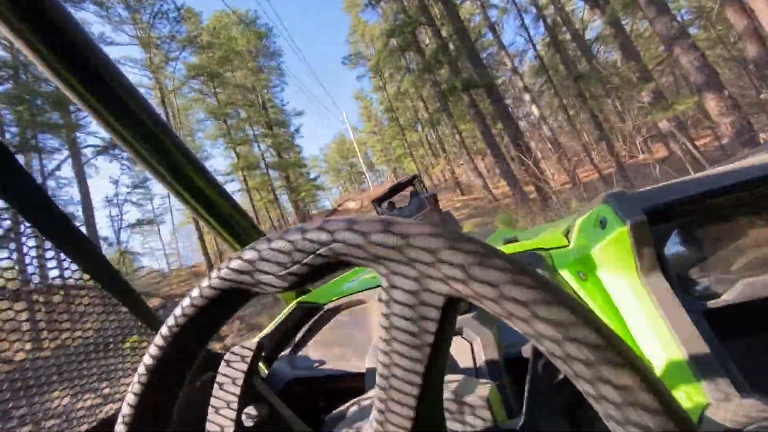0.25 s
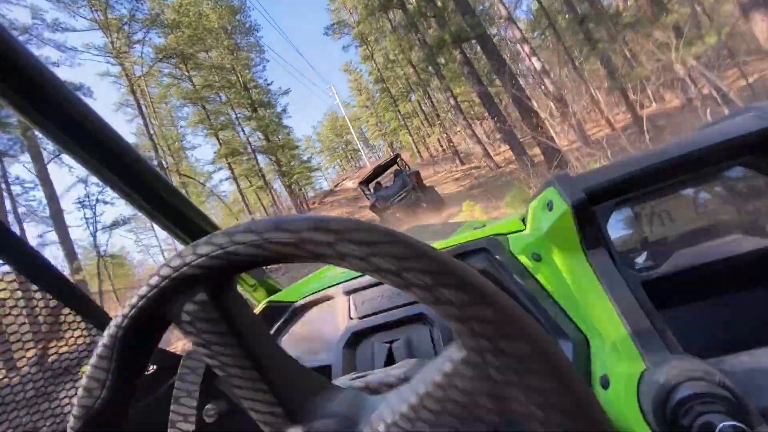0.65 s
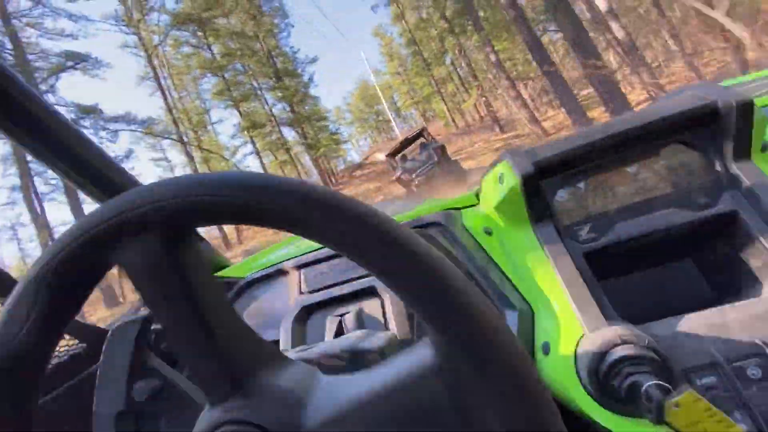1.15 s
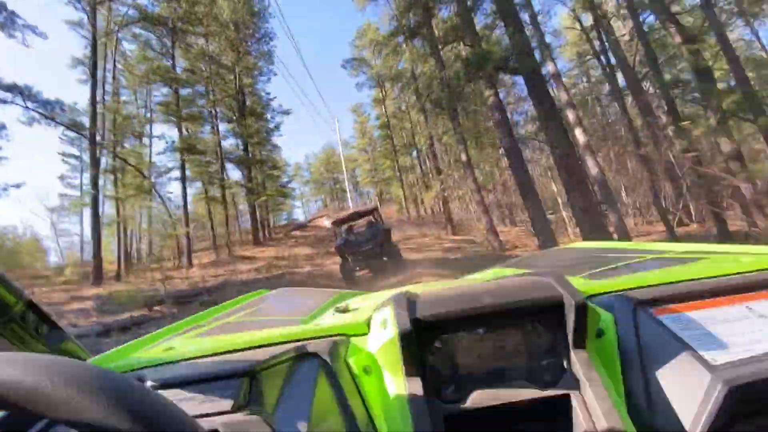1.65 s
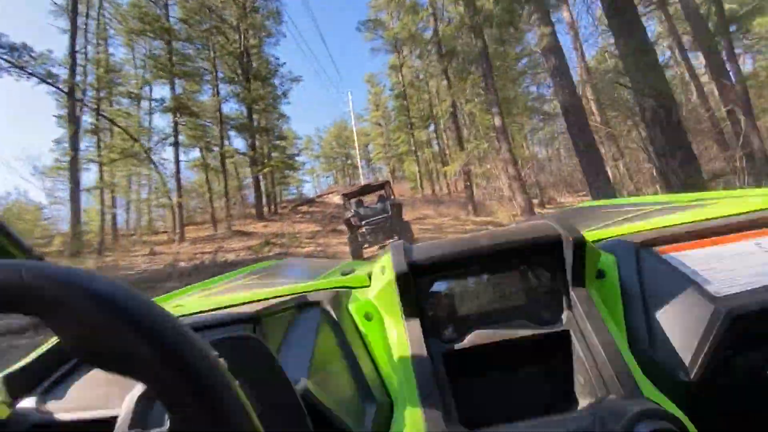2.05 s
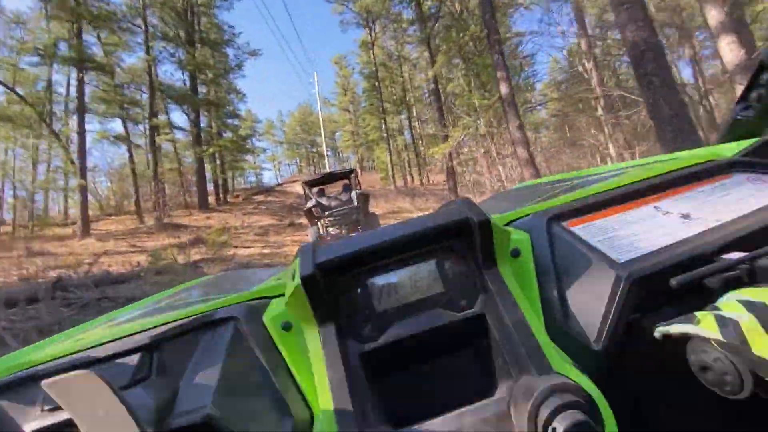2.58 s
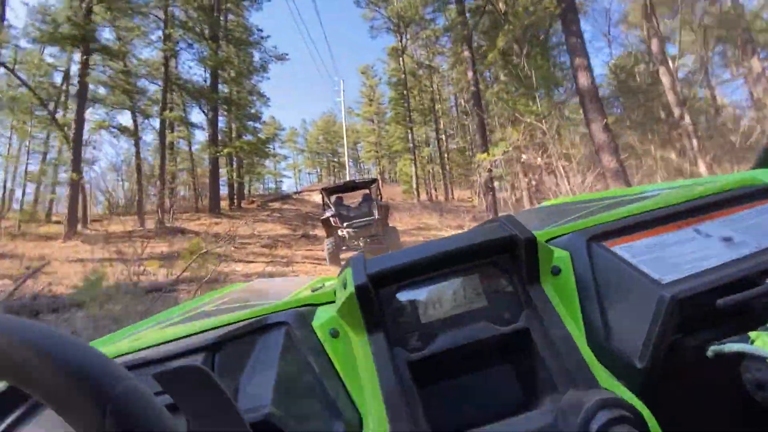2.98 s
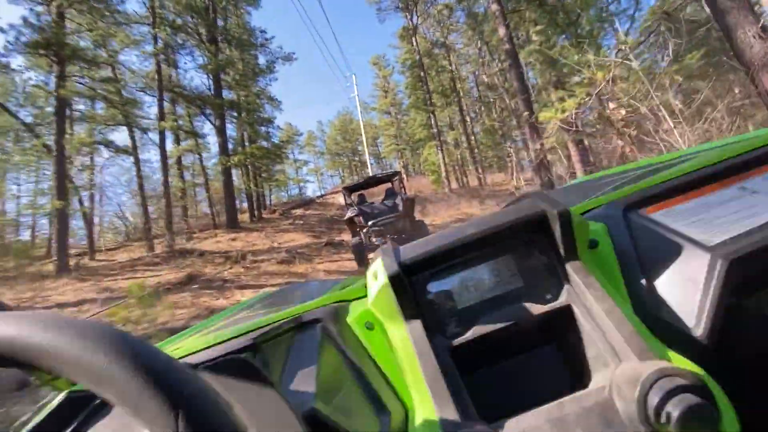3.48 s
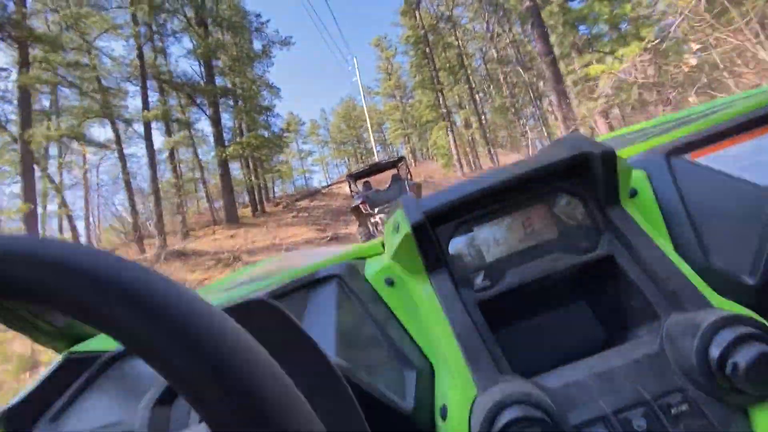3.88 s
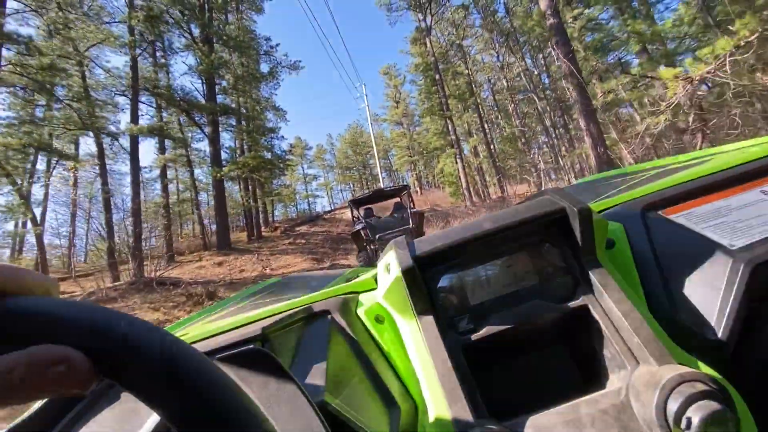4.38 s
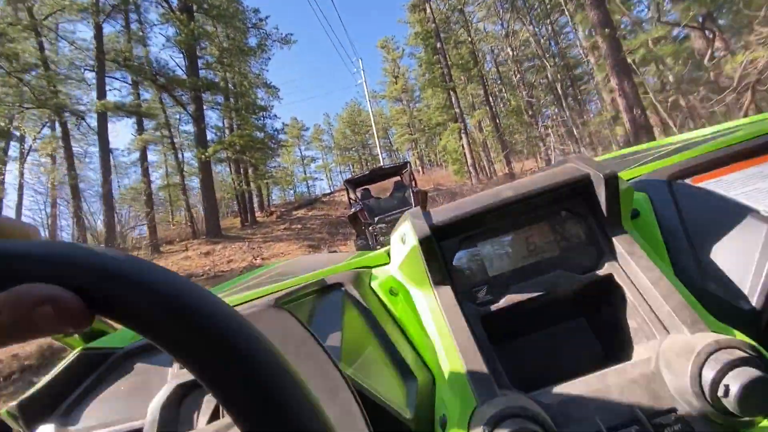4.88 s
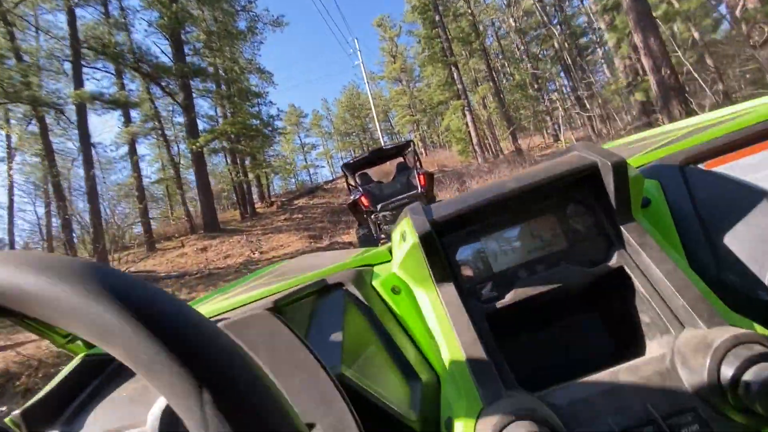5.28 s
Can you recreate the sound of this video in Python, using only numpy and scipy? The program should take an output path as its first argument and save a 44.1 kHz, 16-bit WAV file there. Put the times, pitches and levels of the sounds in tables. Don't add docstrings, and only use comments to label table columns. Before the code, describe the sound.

From the driver's seat, a rough two-cylinder buggy engine pulls hard, peaks early, winds down with stone knocks, and settles to idle.

```python
import sys
import numpy as np
from scipy import signal
from scipy.fft import rfft, irfft
from scipy.io import wavfile
from scipy.ndimage import uniform_filter1d

SR = 44100
rng = np.random.default_rng(int(sys.argv[2]) if len(sys.argv) > 2 else 0)


def transcribe(signal):
    frames = np.atleast_2d(signal).T
    limited = np.clip(frames, -1, 1)
    pcm = np.round(limited * 32767).astype(np.int16)
    wavfile.write(sys.argv[1], SR, pcm)


def rack_gain(trim_db):
    fader = np.asarray(trim_db, float)
    return 10 ** (fader / 20)


N = 243873
T = np.arange(N) / SR
FIRING_GAP = 3 / 8

# time_s, cycle_rate_hz
CYCLE_RATE = [(0.0, 23.14), (0.56, 23.1), (0.98, 28.14), (1.2, 42.75), (1.36, 46.48), (1.55, 46.67),
              (1.96, 40.13), (2.12, 40.73), (2.41, 35.57), (2.87, 33.42), (3.0, 29.58), (3.29, 28.14),
              (3.46, 23.24), (3.61, 23.78), (3.95, 19.14), (4.87, 15.22), (5.0, 11.0), (5.53, 11.85)]
# time_s, effort_db, load_db, shake_db
EFFORT = [(0.0, 6.5, -3, -7.5), (0.7, 6.5, -2, -15.5), (0.9, 8, 0, -5.5), (1.05, 8, -3.5, -9),
          (1.2, 9.5, -0.5, 8), (1.45, 7, 3.5, 7), (1.8, 5.5, -0.5, 14), (2.05, 3, -0.5, 13.5),
          (2.2, 2, -3, 18), (2.45, 0.8, -2.5, 17.5), (2.7, 0, -2, 8.5), (2.95, -3, -0.5, 13),
          (3.2, -2.5, -3, 5.5), (3.48, -4, 3, 1.5), (3.9, -2, -1.5, 2.5), (4.85, -4, 0.4, -1.5),
          (5.0, -12.5, -0.5, -22), (5.53, -13.5, 1.5, -16)]
# centre_s, length_s, level_db
SURGES = [
    (0.0, 0.13, 2.5),
    (0.983, 0.11, 5),
    (1.077, 0.15, 9),
    (1.236, 0.12, 2.5),
    (1.75, 0.16, 1),
    (2.997, 0.04, -5.5),
    (3.21, 0.076, 4.5),
    (3.327, 0.053, 3.5),
    (4.1, .4, 3),
    (4.56, 0.24, 4.5),
]
# order_number, level_db
ORDERS = [(1, -18), (2, -5), (3, 0.14), (4, -6), (5, 9), (6, 7.5), (7, -3.5), (8, 8), (9, -0.5), (10, 4.9),
          (11, 5.5), (12, 1), (13, 7), (14, 0), (15, -1), (16, 11.5)]
# pitch_hz, width_hz, level_db, surge_share_ratio
CAB_MODES = [(58.3, 6.9, -17, .1), (93.7, 43, -13.5, .1), (120.3, 9.2, -24.5, .1), (139.7, 26, -33, .1),
             (178.3, 31, -31.5, .3), (220.1, 40.5, -32.5, 1.13), (258, 63, -39.5, 0.91),
             (344.6, 34.6, -35, .9), (391.4, 40, -35.5, 0.38), (594, 110, -49, 1.84), (826, 130, -62, .6)]
# order_number, centre_s, length_s, level_db
ORDER_SWELLS = [(8, .97, .1, 5), (6, 1.09, .12, 5), (8, 1.23, .12, 5), (8, 1.5, .25, -5), (3, 1.9, .4, 6),
                (8, 2.0, .4, 4), (3, 2.47, .3, -7), (8, 2.72, .3, 5), (3, 3.0, .12, 5), (6, 3.18, .22, 8),
                (3, 3.39, .1, 6), (6, 3.52, .25, -8), (13, .8, .3, 5), (11, 1.05, .1, 6), (19, 1.02, .14, 8),
                (21, 1.0, .12, 8), (16, 3.76, .2, -5), (8, 3.25, .3, -5), (11, 4.2, .4, 4), (10, 4.2, .45, 6),
                (8, 5.25, .7, 5), (6, 5.3, .6, -6)]
# cycle_multiple_ratio, start_s, end_s, level_db
WHINES = [
    (19.0, 1.19, 1.28, -25),
    (19.0, 1.3, 1.9, -35),
    (16.0, 0.0, 2.2, -39),
    (11.0, 2.2, 2.85, -36),
    (19.0, 1.68, 1.8, -31),
    (38.0, 1.82, 2.16, -41),
    (36.0, 2.3, 2.5, -42),
    (11.0, 4.0, 4.88, -31),
    (14.0, 4.0, 4.88, -32),
]
# pitch_hz, density_db (per Hz)
ROAR_SUM = [(20, -42), (60, 9), (120, 2), (250, -8), (450, -13.5), (800, -24.5), (1200, -92)]
ROAR_DIFFERENCE = [(20, -41), (60, -6), (120, -6), (250, -11), (450, -23.5), (800, -19), (1200, -57)]
CLATTER_SUM = [(350, 4.5), (600, 2), (824, 3), (906, -0.5), (995, -0.5), (1270, -2), (1630, -3),
               (2680, -7.5), (3900, -13.5), (6240, -18.5), (8890, -30.5), (9540, -37.5), (10000, -42),
               (13000, -101.5), (22000, -120)]
CLATTER_DIFFERENCE = [(350, -31), (600, -5), (718, -7), (891, -10.5), (1250, -9.5), (1810, -20),
                      (2410, -15), (3170, -15), (4080, -22), (6130, -23.5), (10500, -34.5), (13600, -72),
                      (22000, -120)]
RATTLE_SUM = [(6060, -80.5), (10300, -68.5), (11600, -40), (12300, -12), (13000, -2), (13900, 2),
              (14900, -2), (15500, -18)]
RATTLE_DIFFERENCE = [(5290, -27.5), (9000, -12), (11400, -13), (12300, -10.5), (14000, -18.5), (15000, -27),
                     (15700, -38)]
# pitch_hz, correlation_ratio
IN_STEP = [(100, .3), (1700, .25), (2700, -.2), (5800, -.3), (8400, .25), (10000, .05)]
QUARTER_WAVE = [(300, 0), (2200, .35), (3300, .05), (7500, .6), (9800, 0), (12000, -.5)]
# cruise_db, effort_slope_ratio, surge_share_ratio
ROAR_LAW = (-26, .55, 0.49)
CLATTER_LAW = (-30, 0.86, 0.11)
RATTLE_LAW = (-63, 1.15, .1)
# pitch_hz, width_hz, level_db
PANELS = [(347, 17, -14.5), (402, 77, -17), (777, 34, -22.5), (1208, 77, -25.5), (1670, 210, -33),
          (2070, 220, -24), (3143, 69, -30.5), (5490, 40, -41.5), (5950, 1290, -24.5)]
# start_s, peak_db, ring_hz, brightness_db, left_minus_right_db
KNOCKS = [(.6494, -26, 2060, 3.5, 26.5), (3.692, -24.5, 2340, -4, -16.5), (3.7174, -15, 1840, 3, -1.5),
          (3.7913, -36.5, 2050, 3, -8), (4.0105, -16, 1460, 6, -8.5), (4.037, -16, 1820, -19, -1),
          (4.145, -10, 5940, 7, -7.5), (4.154, -8, 1240, -32.5, -2), (4.4164, -16, 6200, -23, -7),
          (4.4767, -25, 6600, -20.5, 12), (4.52, -24, 1580, -2, -6), (4.7371, -25, 6200, -37, 7),
          (4.794, -44, 1880, 17, -14.5), (4.8998, -18, 2520, -2.5, -4.5),
          (5.1124, -33.5, 2140, -5.5, -18.5), (5.515, -24.5, 1940, -5, -5)]
# start_s, end_s, start_pitch_hz, end_pitch_hz, level_db
SQUEAKS = [
    (2.38, 2.72, 6220, 6150, -48),
    (2.76, 2.93, 6280, 6250, -50),
    (3.31, 3.4, 4720, 4260, -47),
    (2.62, 2.8, 3250, 3150, -48),
    (3.32, 3.62, 2080, 1980, -47),
]
# start_s, end_s, pitch_hz, level_db, right_port_ratio
FIZZES = [
    (.13, .56, 11950, -48, .1),
    (.05, .57, 11000, -47, -1),
    (.05, .58, 13700, -55, .3),
    (3.66, 3.76, 11200, -52, -.5),
]


def evened(x):
    return x / np.sqrt(np.mean(x ** 2) + 1e-20)


def read(points, hz):
    f, value = np.transpose(points)
    return np.interp(np.log(hz + 1), np.log(f + 1), value)


def columns(rows, t=T):
    s, *values = np.transpose(rows)
    return [np.interp(t, s, v) for v in values]


def wander(top_hz, count):
    points = 1200
    steps = rng.standard_normal((count, points))
    rate_hz = np.fft.rfftfreq(points, T[-1] / points)
    slow = irfft(rfft(steps) / (1 + (rate_hz / top_hz) ** 4))
    grid = np.linspace(0, T[-1], points)
    return np.array([np.interp(T, grid, evened(v)) for v in slow])


def resonate(x, hz, width):
    r = np.exp(-np.pi * width / SR)
    if np.ndim(hz) == 0:
        return signal.lfilter([1 - r, 0, r - 1], [1, -2 * r * np.cos(2 * np.pi * hz / SR), r * r], x)
    turn = np.exp(2j * np.pi * np.cumsum(hz) / SR)
    return 2 * (turn * signal.lfilter([1 - r], [1, -r], x / turn)).real


def port_noise(mid, side, side_db, patchy_db):
    hz = np.fft.rfftfreq(1024, 1 / SR)
    a, b, c, d, patch = rng.standard_normal((N // 256 + 5, 513, 5)).T
    patch = uniform_filter1d(patch, size=14, axis=0)
    patch = evened(uniform_filter1d(patch, size=8, axis=1))
    link = (read(IN_STEP, hz) + 1j * read(QUARTER_WAVE, hz))[:, None]
    total = a + 1j * b
    apart = link * total + np.sqrt(1 - abs(link) ** 2) * (c + 1j * d)
    z = np.array([total * rack_gain(read(mid, hz))[:, None], apart * rack_gain(read(side, hz))[:, None]])
    m, s = signal.istft(z * rack_gain(patchy_db * patch), nperseg=1024, noverlap=768)[1][:, :N]
    if side_db is None:
        s = s / np.std(m)
    else:
        s = rack_gain(side_db) * evened(s)
    return np.array([evened(m) + s, evened(m) - s])


def throb(turns, depth, fall):
    strength = rack_gain(2.5 * rng.standard_normal((400, 2)))
    cycles = [turns, turns + 1 - FIRING_GAP]
    hits = sum(strength[c.astype(int), k] * np.exp(-(c % 1) / fall) for k, c in enumerate(cycles))
    return evened(1 + depth * uniform_filter1d(hits, size=40))


def surge(t=T):
    return sum(db * np.exp(-(2 * (t - s) / length) ** 2) for s, length, db in SURGES)


def follow(law):
    cruise_db, slope, share = law
    return cruise_db + slope * columns(EFFORT)[0] + share * surge()


def roar(turns):
    noise = port_noise(ROAR_SUM, ROAR_DIFFERENCE, None, patchy_db=1.2)
    return rack_gain(follow(ROAR_LAW) + 2.5) * noise * throb(turns, depth=0.29, fall=0.13)


def rattle(turns):
    noise = port_noise(RATTLE_SUM, RATTLE_DIFFERENCE, 9.5, patchy_db=1.6)
    return rack_gain(follow(RATTLE_LAW)) * noise * throb(turns, depth=.8, fall=.1)


def clatter(turns):
    noise = port_noise(CLATTER_SUM, CLATTER_DIFFERENCE, -1.5, patchy_db=1.5)
    return rack_gain(follow(CLATTER_LAW)) * noise * throb(turns, depth=0.25, fall=0.24)


def squeaks():
    out = np.zeros((2, N))
    rows = [(a, b, hz0, hz1, 80, db, .5) for a, b, hz0, hz1, db in SQUEAKS]
    rows += [(a, b, hz, hz, 480, db, right) for a, b, hz, db, right in FIZZES]
    for start_s, end_s, hz0, hz1, width, db, right in rows:
        a, b = round(start_s * SR), round(end_s * SR)
        hz = np.linspace(hz0, hz1, b - a)
        noise = rng.standard_normal(b - a)
        tone = evened(resonate(resonate(noise, hz, width), hz, width))
        tone = rack_gain(db) * tone * signal.windows.tukey(b - a, .4)
        out[:, a:b] += tone * [[1], [right]] * np.sqrt(2 / (1 + right ** 2))
    return out


def knocks():
    out, t = np.zeros((2, N + SR)), np.arange(SR // 5) / SR
    bright = signal.butter(2, [2000 / (SR / 2), 12500 / (SR / 2)], "band")
    rise = np.minimum(t / .001, 1)
    for s, db, ring_hz, bright_db, pan_db in KNOCKS:
        t60 = .095 * (ring_hz / 2000) ** -0.22
        a, b = rng.standard_normal((2, 2, len(t)))
        a[1] = np.roll(a[0], 2) + 0.4 * a[1]
        crack = rack_gain(bright_db - 60 * t / (.5 * t60)) * signal.lfilter(*bright, a)
        panel = np.array([evened(resonate(resonate(v, ring_hz, 650), ring_hz, 2200)) for v in b])
        ring = rack_gain(-60 * t / t60) * panel
        at = round(s * SR)
        pan = rack_gain([[pan_db / 2], [-pan_db / 2]])
        out[:, at:at + len(t)] += rack_gain(db - 12.0) * (crack + ring) * rise * pan
    return out[:, :N]


def panels(turns):
    clatter_db = follow(CLATTER_LAW)
    taps = rng.standard_normal((2, N)) * throb(turns, depth=0.95, fall=0.41)
    taps[1] += .5 * taps[0]
    swell_db = 1.7 * wander(5., count=len(PANELS))
    out = np.zeros((2, N))
    for (hz, width, db), swell in zip(PANELS, swell_db):
        ring = np.array([evened(resonate(resonate(v, hz, width), hz, 3 * width)) for v in taps])
        load_db = (hz < 900) * 0.76 * (clatter_db + 27.5)
        out += rack_gain(db + swell + load_db) * ring
    return rack_gain(clatter_db + 10.0) * out


def whines(turns):
    rise_db_per_s, fall_db_per_s = 220, 70
    drift = wander(14.0, count=20)
    port_phase = np.array([[.7], [-.7]])
    out = np.zeros((2, N))
    for i, (k, a, b, db) in enumerate(WHINES):
        fade_db = rise_db_per_s * np.maximum(a - T, 0) + fall_db_per_s * np.maximum(T - b, 0)
        level = np.sqrt(2) * rack_gain(db - fade_db + 4.0 * drift[i])
        out += level * np.cos(2 * np.pi * k * turns + .8 * drift[10 + i] + port_phase)
    return out


def engine(hz, turns):
    t, k = T[::128], np.arange(1, 37)[:, None]
    pitch = k * hz[::128]
    pair = 1 + .65 * np.exp(-2j * np.pi * k * FIRING_GAP)
    low_orders = rack_gain(np.array(ORDERS)[:, 1:])
    order = np.vstack([low_orders, rack_gain(-1.1) * abs(pair[len(ORDERS):])])

    lurch_db, (effort, load, shake) = surge(t), columns(EFFORT, t)
    power = 0
    for mode_hz, width, db, share in CAB_MODES:
        power = power + (rack_gain(db + share * lurch_db) / (1 + (2 * (pitch - mode_hz) / width) ** 2)) ** 2
    cab = np.sqrt(power)

    shaken = (k == 4) + 0.23 * np.isin(k, (7, 9, 12))
    swell_db = effort + load + shaken * shake
    for n, s, length, db in ORDER_SWELLS:
        swell_db[n - 1] += db * np.exp(-(2 * (t - s) / length) ** 2)
    size = np.sqrt(2) * order * cab * rack_gain(swell_db)

    uneven = wander(6.3, count=72)
    out = np.zeros(N)
    for i in range(36):
        swing = rack_gain(min(.12 * i + .4, 1.7) * uneven[i])
        jitter = min(.02 * i, .28) * uneven[36 + i]
        phase = 2 * np.pi * (i + 1) * turns + np.angle(pair[i, 0]) + .04 * i ** 2 + jitter
        out += np.interp(T, t, size[i]) * swing * np.cos(phase)
    later = np.roll(out, 4)
    return np.array([rack_gain(-4.13) * later, rack_gain(-4.84) * out])


def scene():
    hz, = columns(CYCLE_RATE)
    turns = np.cumsum(hz) / SR + 0.2989
    background = roar(turns) + rattle(turns) + clatter(turns)
    struck = squeaks() + knocks() + panels(turns)
    return background + struck + whines(turns) + engine(hz, turns)


def top_cut(x):
    return signal.sosfilt(signal.butter(12, 15710, fs=SR, output="sos"), x)


def record(dry):
    ports = dry - .95 * resonate(dry.mean(0), 10900, 2600)
    ceiling = .93
    limited = ports / (1 + abs(ports / ceiling) ** 6) ** (1 / 6)
    return top_cut(limited)


dry = scene()
out = record(dry)
transcribe(out)
```